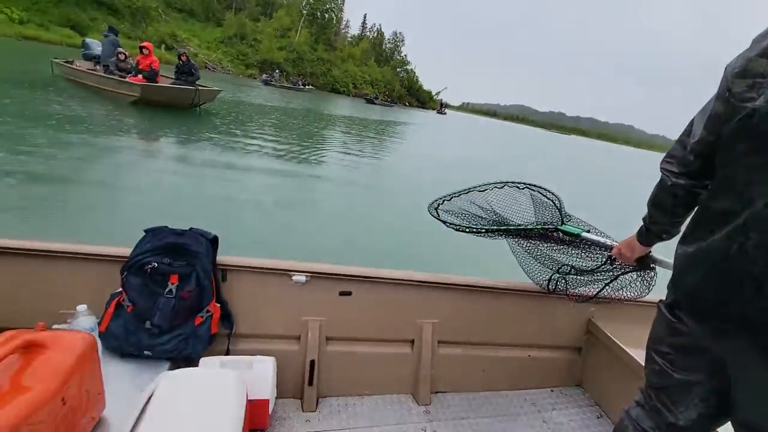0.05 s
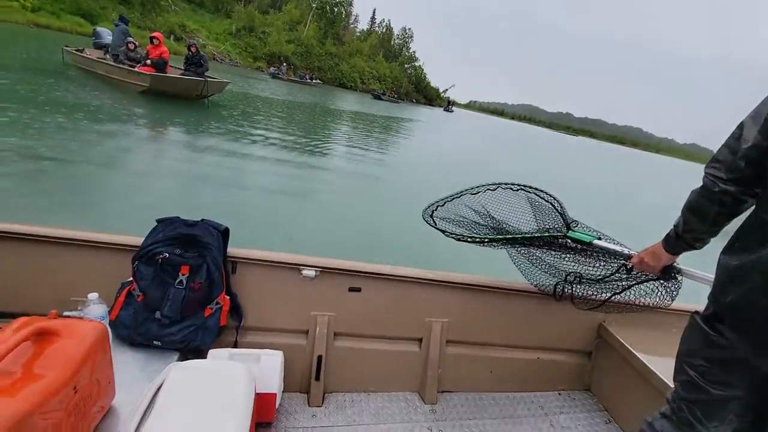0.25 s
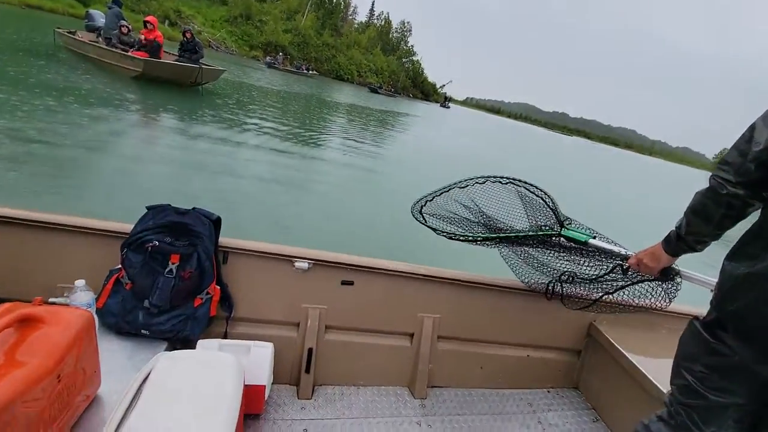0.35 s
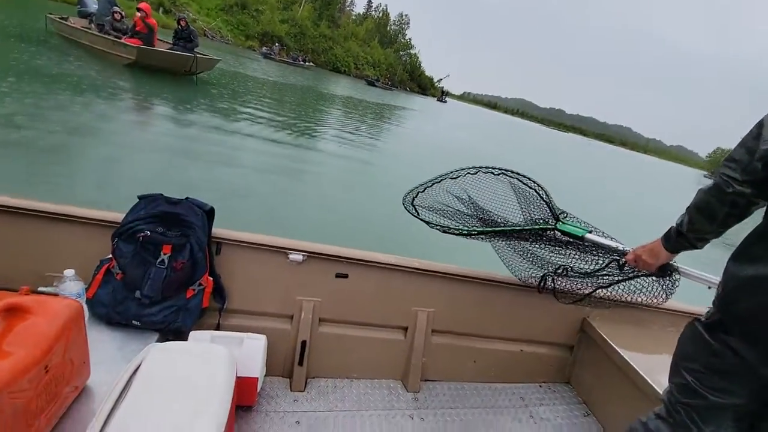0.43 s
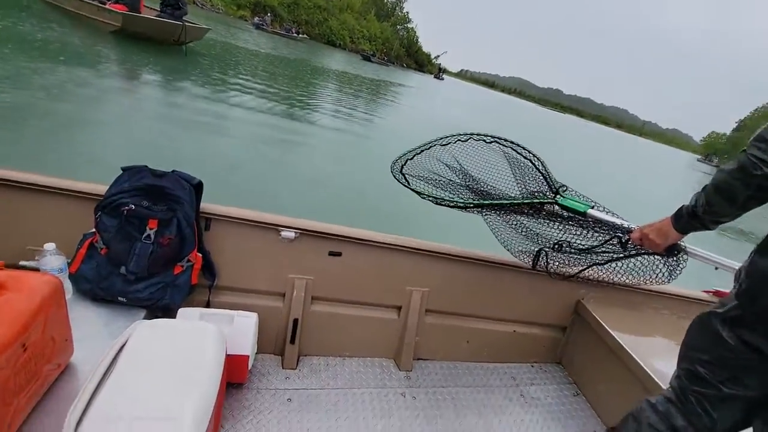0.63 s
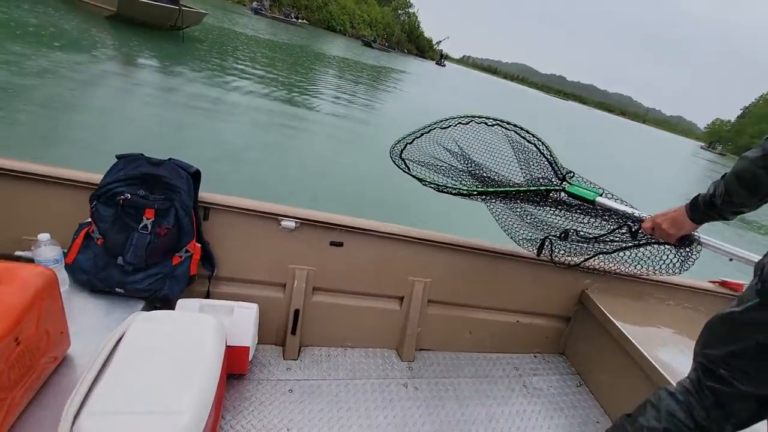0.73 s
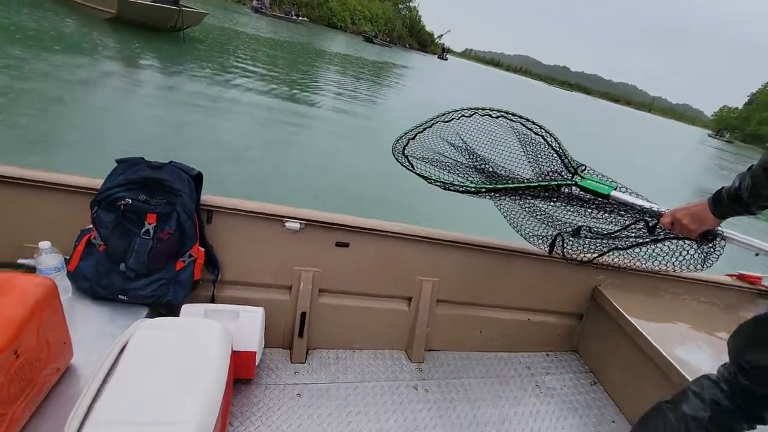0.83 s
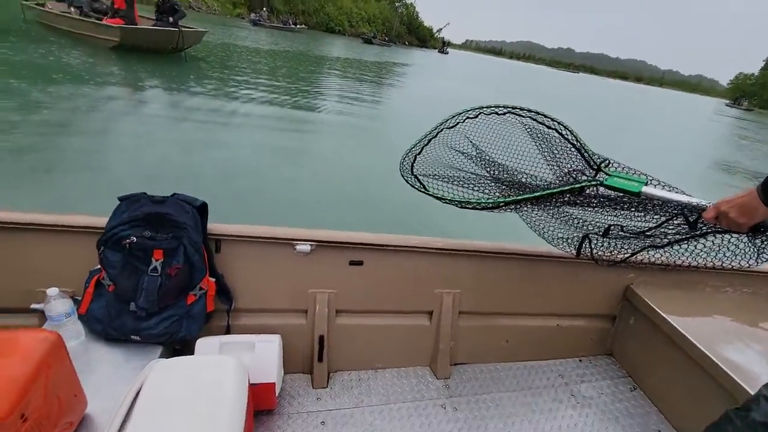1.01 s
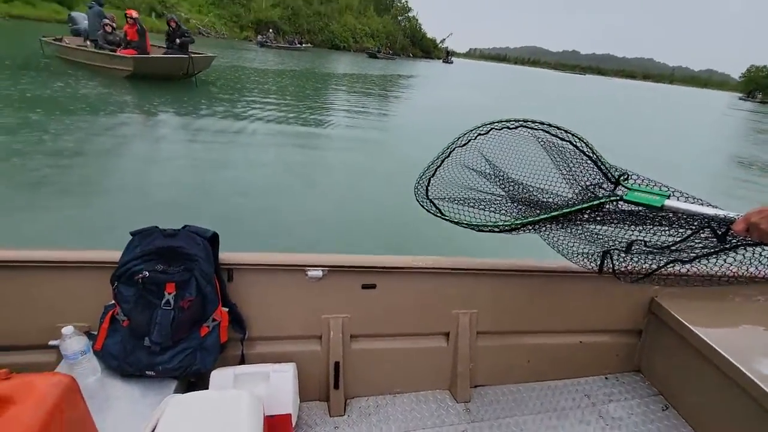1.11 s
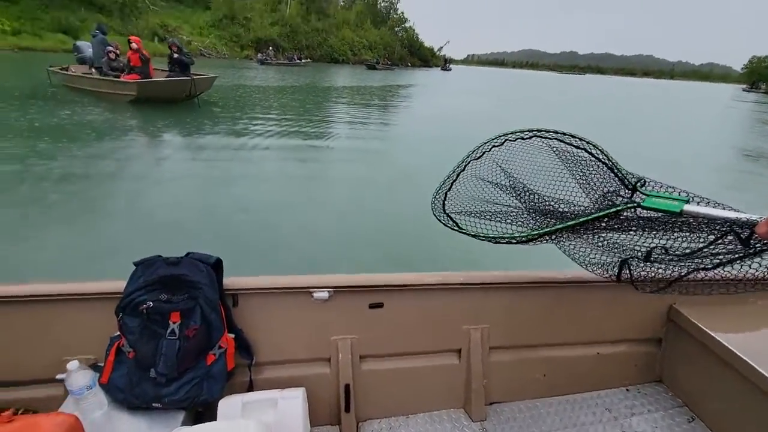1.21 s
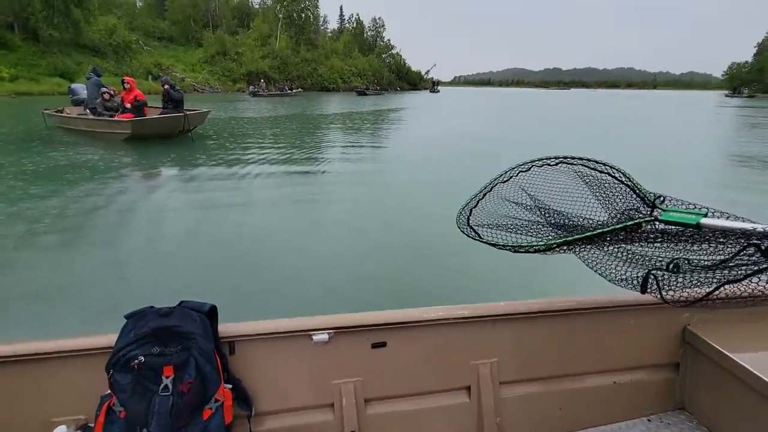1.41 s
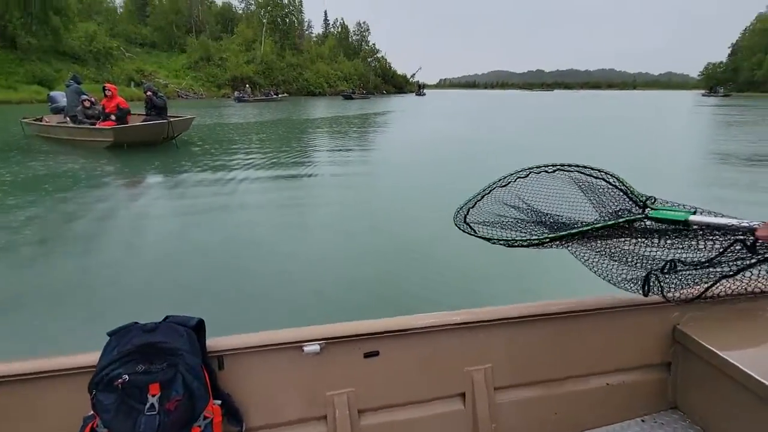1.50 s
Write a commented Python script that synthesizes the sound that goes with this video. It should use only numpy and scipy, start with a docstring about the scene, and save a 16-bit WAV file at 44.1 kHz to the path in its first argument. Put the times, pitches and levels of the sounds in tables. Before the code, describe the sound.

Footsteps boom in an open metal boat and ring its hull. A sharp metal clack lands with a step at about 0.2 seconds, then the heaviest thump and a clatter around 0.45. A sole squeaks faintly at 0.6. From 0.9 a jacket rustles softly among lighter steps, with a bright clink near 1.25. Water laps quietly under a faint hiss throughout; the clacks sit to the left.

```python
"""An open aluminium boat on a river, with someone stepping about in it.
Each step booms in the floor and rings the hull panels. Loose metal clacks, a small fixture clinks,
a rubber sole squeaks as it slips and a rain jacket rustles, over quietly lapping water and a far hiss.
The right microphone is muffled and honks in the low mids, so the clacks sit on the left."""
import sys
import numpy as np
from scipy import signal
from scipy.fft import rfft, irfft, next_fast_len
from scipy.io import wavfile
from scipy.ndimage import map_coordinates

SR = 44100
rng = np.random.default_rng(int(sys.argv[2]) if len(sys.argv) > 2 else 0)


def pcm_store(signal):
    """Save signal as 16-bit PCM."""
    levels = np.round(np.clip(np.atleast_2d(signal), -1, 1) * 32767)
    wavfile.write(sys.argv[1], SR, levels.astype(np.int16).T)


N = 68355
TIME = np.arange(N) / SR


def amp(db):
    """Decibels to gain."""
    return 10 ** (np.asarray(db) / 20)


def unit(x):
    """Scale to rms 1."""
    return x / np.sqrt(np.mean(x ** 2) + 1e-20)


def along(points, hz):
    """Read a curve of (f/Hz, value) points on a log frequency axis."""
    f, v = np.transpose(points)
    return np.interp(np.log(hz + 1), np.log(f + 1), v)


def wobble(rate):
    """Smooth random modulation, rate knots a second."""
    return map_coordinates(rng.standard_normal(N), [np.arange(N) * min(rate / SR, .5)])


def filtered(x, response):
    """EQ x with a complex response of frequency."""
    size = next_fast_len(N + SR // 2)
    return irfft(rfft(x, size) * response(np.fft.rfftfreq(size, 1 / SR)), size)[..., :N]


def noise(colour, tilt=0):
    """Coloured noise of rms 1, tilted in dB per octave."""
    eq = lambda hz: amp(along(colour, hz) + tilt * np.log2(hz + 1))
    return unit(filtered(rng.standard_normal(N), eq))


def since(start):
    """Seconds since start, zero before it."""
    return np.maximum(TIME - start, 0)


def fade(t, t60):
    """Exponential decay, 60 dB down after t60 seconds."""
    return amp(-60 * t / t60)


def swell(t, rise):
    """Soft attack with a time constant of rise seconds."""
    return 1 - np.exp(-t / rise)


def mode(t, hz, t60, phase):
    """One resonance: a decaying sine, its phase in turns."""
    return np.sin(2 * np.pi * (hz * t + phase)) * fade(t, t60)


def floor_boom(t, hz, t60, rise, partner_ratio=1.27, partner_db=-6):
    """The floor's two lowest modes beat together; their pitch depends on where the weight lands."""
    lowest = np.sin(2 * np.pi * hz * t)
    partner = amp(partner_db) * np.sin(2 * np.pi * partner_ratio * hz * t)
    return np.sqrt(2) * (lowest + partner) * swell(t, rise) * fade(t, t60)


# Ringing hull panels: f/Hz, relative level/dB, t60/s
PANEL_MODES = [(154.4, -6, 0.32), (204.9, -6.5, 0.67), (236.7, -3.5, 0.44), (286.2, -4.5, 0.34),
               (314.5, -4.5, 0.18), (345, -2, 0.083), (395, 4.5, .46), (436, -2.5, .3), (466, -1.5, .32),
               (557, -10, 0.57), (600, -9.5, 0.23), (820, -3.5, 0.16), (976.4, -16.5, 0.39),
               (1264, -11, 0.31)]
# Colour of the wash of weaker hull modes: f/Hz, relative level/dB
WASH_COLOUR = [(20, -45), (45, -11.5), (70, 4.5), (140, -0.5), (290, -5), (450, -0.5), (600, -3.5),
               (900, -10), (1500, -23), (3000, -65)]
# Decay of that wash: f/Hz, t60/s
WASH_DECAY = [(60, 0.66), (200, 0.89), (450, 0.69), (750, 0.3), (1500, 0.2)]


def hull_ring(t, tilt, favoured_hz, boost_db, pivot_hz=350, width_octaves=.22,
              panels_db=-4.5, scatter_db=2.5, wash_db=-2):
    """Panel modes over a wash; each blow has its own brightness and favours panels near one pitch."""
    def drive_db(hz):
        octaves_up = np.log2(np.maximum(hz, PANEL_MODES[0][0]) / pivot_hz)
        distance = np.log2((hz + 1) / favoured_hz) / width_octaves
        return tilt * octaves_up + boost_db * np.exp(-.5 * distance ** 2)

    chance = rng.standard_normal((len(PANEL_MODES), 2))
    panels = sum(amp(db + drive_db(hz) - scatter_db * scatter) * mode(t, hz, t60, phase)
                 for (hz, db, t60), (scatter, phase) in zip(PANEL_MODES, chance))
    band_hz, frame_s, bands = signal.stft(noise(WASH_COLOUR), SR, nperseg=1024)
    age = np.interp(frame_s, TIME, t)
    decay = fade(age, along(WASH_DECAY, band_hz)[:, None])  # each band dies at its own rate
    wash = signal.istft(bands * amp(drive_db(band_hz))[:, None] * decay, SR)[1][:N]
    return amp(panels_db) * panels + amp(wash_db) * wash


# Steps and bumps: t/s; boom f/Hz, level/dB, t60/s, attack/s;
# ring level/dB, attack/s, tilt/(dB/octave), favoured f/Hz, its boost/dB, damping/(dB/s, sign ignored)
STEPS = [(-.03, 94.2, -27.5, 0.82, 0.0074, -44.5, 0.011, -6, 141, 5, 5.5),
         (.237, 81.3, -20, 0.34, 0.02, -28.5, 0.00095, 0.5, 560, 9.5, 59),
         (.274, 82.3, -22.5, 0.25, 0.026, -33, 0.0014, -0.5, 346, 11.5, 36),
         (.429, 73.8, -6, 0.26, 0.037, -19.5, 0.003, 3, 830, 7, 17),
         (.463, 89.4, -23, 0.52, .003, -22.5, 0.0049, -2.5, 429, 12, 33.5),
         (.492, 82.04, -23, 0.47, .014, -26, 0.0025, -7, 440, 16.5, 226),
         (.551, 64.8, -23, 0.59, 0.021, -32, 0.024, -4, 350, 7.5, -4),
         (.887, 69.5, -15.9, .21, .045, -43, 0.0064, -6.5, 430, 9, -1),
         (.948, 72, -23.5, .44, 0.011, -37, 0.0017, -4, 420, 10, 43),
         (1.131, 89, -15, 0.11, 0.0052, -29.5, 0.0069, 1.5, 601, 7, 16),
         (1.132, 160.4, -16, 0.14, 0.0096, -40, 0.0023, -6.5, 158, 14, 4),
         (1.198, 61.8, -21, 0.38, 0.0033, -35.5, 0.0035, -2.5, 380, 2, 7),
         (1.365, 69.6, -29.5, 0.3, 0.026, -52.5, .002, 4, 158, 17, 16),
         (1.433, 68.6, -41, 0.11, 0.0044, -49.5, .002, 0.5, 385, 6, 0)]


def steps():
    """Every step sets the floor booming and the hull ringing; a sole that stays down damps the ring."""
    out = np.zeros(N)
    for start, hz, boom_db, t60, rise, ring_db, ring_rise, tilt, favoured_hz, boost_db, damping in STEPS:
        t = since(start)
        out += amp(boom_db) * floor_boom(t, hz, t60, rise)
        ring_envelope = amp(ring_db - abs(damping) * t) * swell(t, ring_rise)
        out += ring_envelope * hull_ring(t, tilt, favoured_hz, boost_db)
    return out


# Dark lapping of the water: f/Hz, relative level/dB
LAP_COLOUR = [(20, -5), (70, 7), (150, -3.5), (300, -10.5), (395, -1.5), (470, -2), (700, -14),
              (1500, -61.5)]
# Airy bed of the open river: f/Hz, relative level/dB
HISS_COLOUR = [(300, 1.5), (700, 12), (1400, 4), (3600, -0.5), (7000, -6.5), (15000, -24.5)]


def river(lap_db=-47, sway_db=1.5, hiss_db=-55.5):
    """Water laps along the hull under a steady, distant hiss."""
    lapping = amp(lap_db + sway_db * wobble(11.9)) * noise(LAP_COLOUR)
    return lapping + amp(hiss_db) * noise(HISS_COLOUR)


# Swells of the jacket's rustle: t/s, level/dB
JACKET_ENVELOPE = [(.08, -63.5), (.17, -63), (.6, -66), (.79, -61.5), (.88, -52.5), (.98, -49),
                   (1.071, -48), (1.12, -56), (1.29, -47.5), (1.35, -59), (1.42, -57.5), (1.55, -59)]
# Colour of the cloth: f/Hz, relative level/dB
JACKET_COLOUR = [(500, 11), (1500, -9.5), (3900, -0.5), (5400, -11), (7800, -3), (12000, -8), (15500, -9)]


def jacket(crinkle_db=1.2, flutter_db=1.3):
    """Stiff cloth swishes as the arm moves."""
    level_db = np.interp(TIME, *np.transpose(JACKET_ENVELOPE))
    cloth = noise(JACKET_COLOUR)
    texture = amp(crinkle_db * wobble(130) + flutter_db * wobble(45))
    return amp(level_db) * unit(cloth * texture)


# Light touches on a small fixture: t/s, level/dB, high-pass corner f/Hz
CLINK_HITS = [(0.041, -42, 5300), (0.675, -41.5, 6300), (.707, -40, 7200), (1.2452, -27.5, 1930),
              (1.395, -43, 5800)]
# Colour of the tick: f/Hz, relative level/dB
TICK_COLOUR = [(500, 10.5), (2800, 1), (7000, 5), (10000, -8.5), (15500, -9.5)]
# Ring of the fixture: f/Hz, relative level/dB, t60/s
FIXTURE_MODES = [(2670, 2, 0.055), (3130, 3, 0.062), (3700, -4, 0.061), (4150, 0.5, 0.097),
                 (5250, -2, 0.11)]


def clinks(rise_s=.00062, tick_t60_s=.059, ring_db=-9):
    """A light, bright tick rings the fixture; the lightest touches reach only its top modes."""
    out = np.zeros(N)
    for start, db, corner_hz in CLINK_HITS:
        t = since(start)
        high_pass = lambda hz: 1 - 1 / (1 + (hz / corner_hz) ** 6)
        tick = filtered(noise(TICK_COLOUR), high_pass) * fade(t, tick_t60_s)
        ring = sum(amp(level) * high_pass(hz) * mode(t, hz, t60, rng.random())
                   for hz, level, t60 in FIXTURE_MODES)
        out += amp(db) * swell(t, rise_s) * (tick + amp(ring_db) * ring)
    return out


# Hits of loose metal: t/s, level/dB, attack/s, t60/s, tilt/(dB/octave)
CLACK_HITS = [(0.2311, -17.5, 0.0094, 0.071, -1), (0.2371, -14.5, 0.0014, 0.022, 2),
              (0.273, -36, .002, 0.14, -5), (0.3107, -33, 0.0018, 0.079, -0.7),
              (0.4244, -19, 0.0037, 0.25, -8), (0.4345, -23.5, 0.0046, 0.084, 0),
              (.453, -26.5, 0.0012, 0.046, .5), (.465, -30.5, 0.0011, 0.43, -10.5),
              (0.891, -48.5, 0.0023, 0.09, -1), (0.9454, -47.5, 0.0009, 0.033, -0.5),
              (0.997, -43, 0.0008, 0.031, -5), (1.056, -51, 0.0022, .05, 3.5),
              (1.136, -34.5, 0.00046, 0.07, 1), (1.149, -33, 0.002, 0.085, -7),
              (1.1971, -39.5, 0.0003, 0.041, -4), (1.364, -56, 0.00056, 0.034, -6),
              (1.433, -53, 0.00055, 0.014, -11)]
# Colour of the crash: f/Hz, relative level/dB
CRASH_COLOUR = [(30, -87), (200, -9), (520, -14.5), (700, -12), (920, -8), (1120, 0), (1550, -7),
                (1850, -2.5), (2400, -2.5), (3700, 0), (5000, -3), (7200, -4.5), (10000, -15),
                (15500, -23.5)]
# Ring of the loose metal: f/Hz, relative level/dB, t60/s
METAL_MODES = [(1093, -2, .15), (1352, -7, .11), (1685, -6, .15), (1827, -6, .12), (2069, -8, .12),
               (2345, -2, .08), (2440, -6, .1), (2692, -7, .15), (3031, -7, .12), (3465, -3, .07),
               (3573, -7, .08), (3755, -7, .1), (4527, -8, .05), (6331, -14, .12)]


def clacks(grit_db=2, tail_db=-10, tail_t60_s=.15, ring_db=-7):
    """Hard contacts: a gritty crash of thin metal with a few short modes."""
    out = np.zeros(N)
    for start, db, rise, t60, tilt in CLACK_HITS:
        t = since(start)
        crash = unit(noise(CRASH_COLOUR, tilt) * amp(grit_db * wobble(700)))
        crash *= fade(t, t60) + amp(tail_db) * fade(t, tail_t60_s)
        ring = sum(amp(level) * mode(t, hz, life, rng.random()) for hz, level, life in METAL_MODES)
        out += amp(db) * swell(t, rise) * (crash + amp(ring_db) * ring)
    return out


# Chirps of the slipping sole: t/s, length/s, f/Hz, pitch drop/fraction, level/dB
SOLE_TONES = [(0.589, 0.065, 2754, 0.12, -48.5), (0.598, 0.06, 3500, .01, -56),
              (0.636, 0.02, 1108, 0.092, -42)]


def sole_squeak(roughness=.045):
    """Rubber slips on metal in a few short, rough, falling tones."""
    out = np.zeros(N)
    for start, length, hz, drop, db in SOLE_TONES:
        progress = np.minimum(since(start) / length, 1)
        pitch_hz = hz * (1 - drop * progress ** 2 + roughness * wobble(800))
        arch = 2 * np.sqrt(progress * (1 - progress))
        out += amp(db) * arch * np.sin(2 * np.pi * np.cumsum(pitch_hz) / SR)
    return out


def side_reflections(x, corner_hz=800, t60_s=.081):
    """Quick, thin reflections between the boat's sides, different at each microphone."""
    tail = noise([(corner_hz / 2, -20), (corner_hz, 0)]) * fade(TIME, t60_s)
    return signal.fftconvolve(x, tail / np.linalg.norm(tail))[:N]


def scene(left_wet_db=-19, right_wet_db=-7):
    """All sounds of the boat at the two microphones; the right one hears more reflections."""
    boat = steps() + clacks() + clinks() + sole_squeak() + jacket() + river()
    return np.array([boat + amp(db) * side_reflections(boat) for db in (left_wet_db, right_wet_db)])


# Dull, honky EQ of the right microphone: f/Hz, level/dB
RIGHT_EQ = [(60, 2.5), (160, 3.5), (240, 6.5), (310, 11), (400, 7), (480, 7.5), (600, -0.5), (850, -5.5),
            (1250, -13), (2200, -13.5), (3500, -18), (5500, -21.5), (10000, -29.5), (15000, -33)]
# Its phase behind the left: f/Hz, lag/rad
RIGHT_LAG = [(200, 0.033), (280, 0.27), (380, 2.65), (600, 2.507), (1000, 2.13), (1350, 4.68), (15000, 4.8)]


def record(dry, hiss_db=-87.5, low_cut_hz=25, high_cut_hz=15900):
    """The right microphone is muffled and hisses faintly; both get a low cut, soft clip and high cut."""
    right = filtered(dry[1], lambda hz: amp(along(RIGHT_EQ, hz)) * np.exp(-1j * along(RIGHT_LAG, hz)))
    right += amp(hiss_db) * rng.standard_normal(N)
    low_cut = signal.butter(2, low_cut_hz, 'high', fs=SR, output='sos')
    pair = signal.sosfilt(low_cut, np.array([dry[0], right]))
    rounded = pair / (1 + np.abs(pair) ** 6) ** (1 / 6)
    return filtered(rounded, lambda hz: hz < high_cut_hz)


dry = scene()
out = record(dry)
pcm_store(out)
```